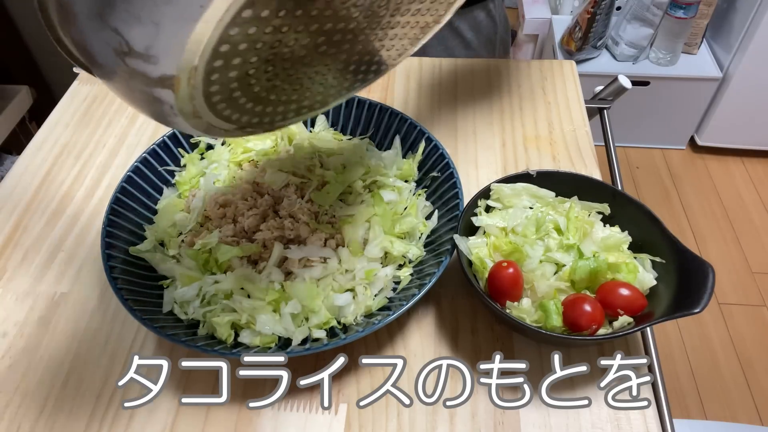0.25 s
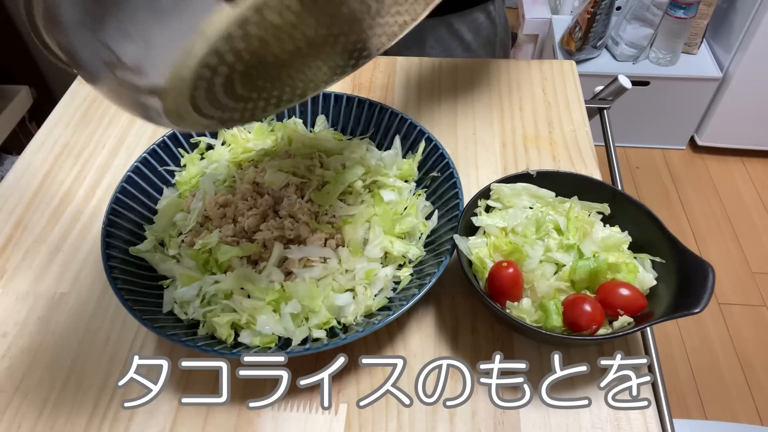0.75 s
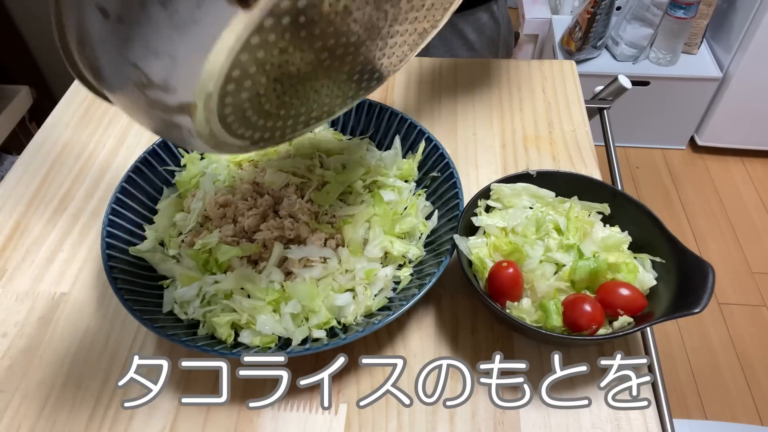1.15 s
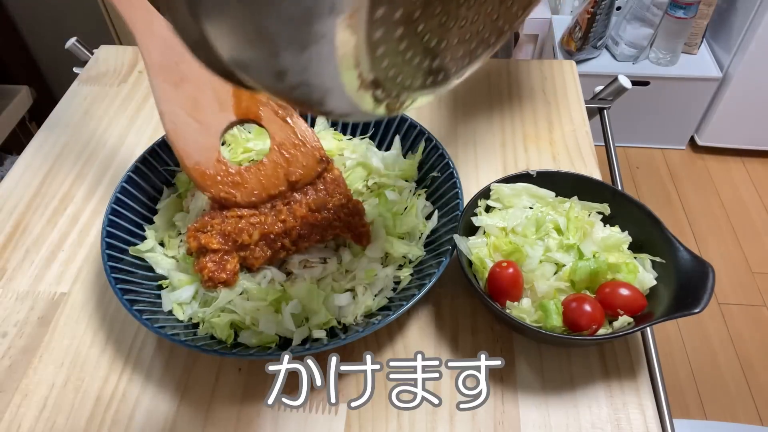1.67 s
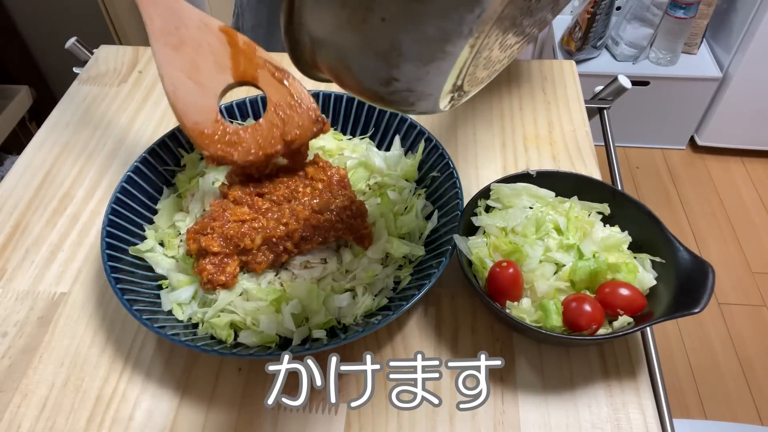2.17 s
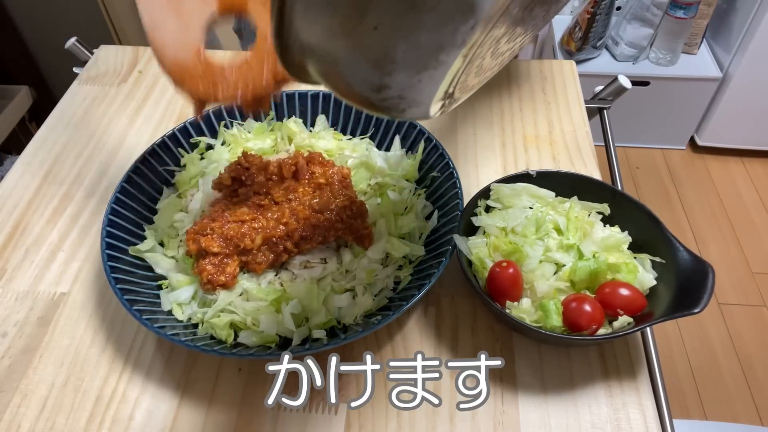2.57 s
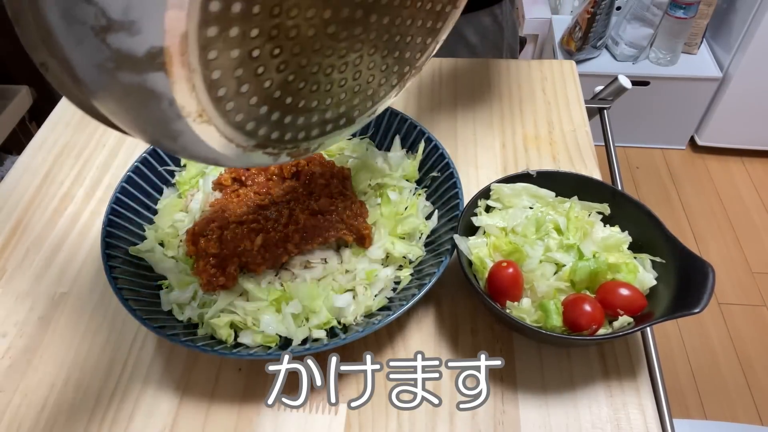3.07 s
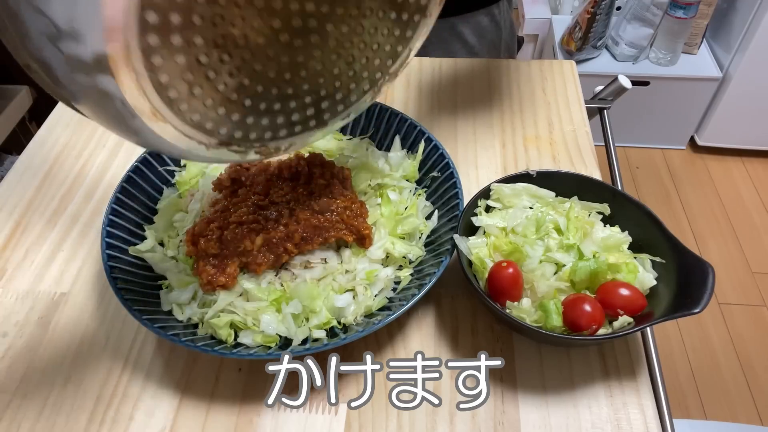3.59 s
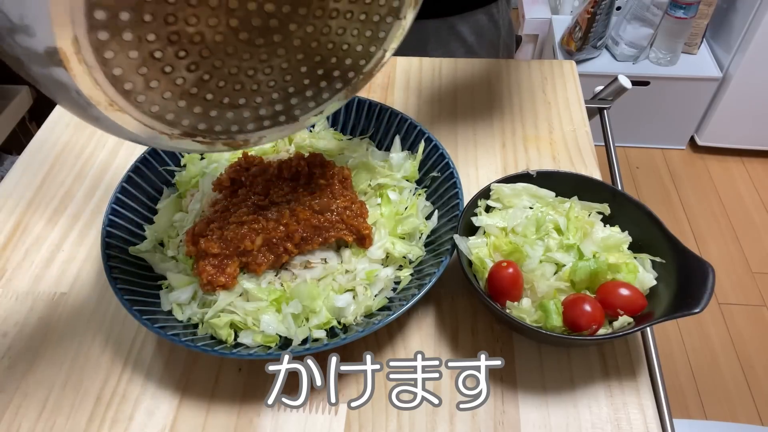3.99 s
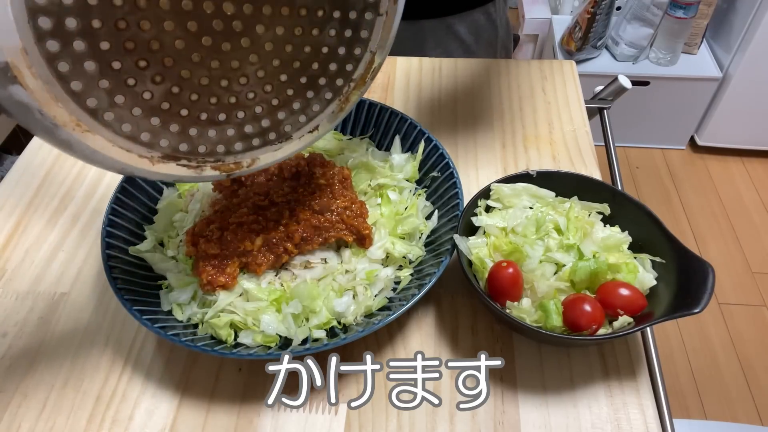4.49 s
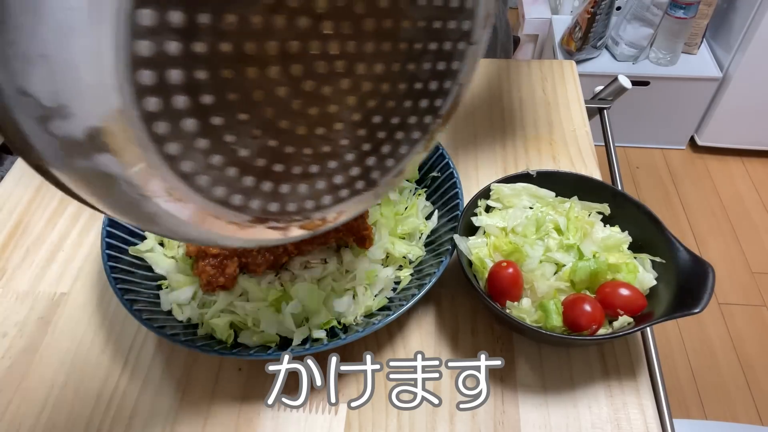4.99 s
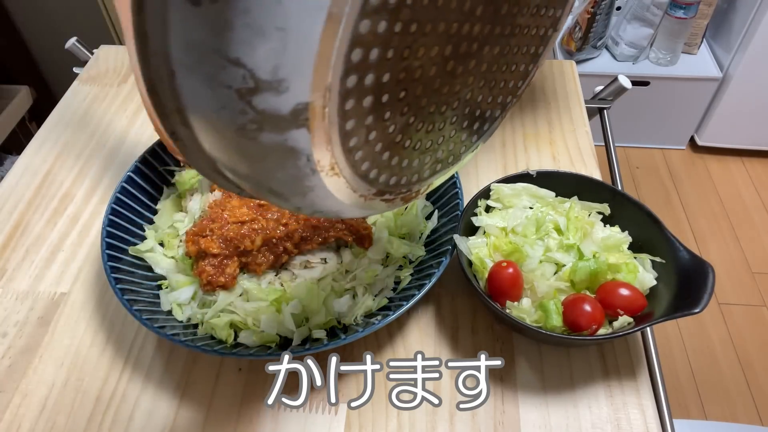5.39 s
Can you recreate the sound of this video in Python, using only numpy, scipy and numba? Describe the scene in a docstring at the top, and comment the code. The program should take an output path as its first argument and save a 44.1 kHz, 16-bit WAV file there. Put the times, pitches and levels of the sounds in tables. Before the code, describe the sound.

Close to the microphone in a small, softly humming kitchen, wood clacks and drags against the inside of a sauce-coated steel pot four times, with a slight squeak. Faint wet ticks fill a short break. A second run of sharp knocks and gritty scrapes follows, the metal ringing more freely and the hardest hits slightly overloading. Only light ticks and the hum remain at the end.

```python
"""A wooden spatula pushes thick sauce out of a steel pot, close to a phone in a small, humming kitchen.
First come four strokes: each knock rings the blade and the sauce-damped pot, then the blade drags in
stick-slip friction. Sauce ticks wetly through a pause. From 2.9 s the strokes resume on ever barer steel,
which rings more freely and scrapes brighter; the hardest knocks overload the microphones.
After 4.8 s only a few ticks and a faint hollow rush remain over the appliance hum."""
import sys
import numpy as np
from scipy import signal
from scipy.fft import rfft, irfft, next_fast_len
from scipy.io import wavfile
from numba import njit

SR = 44100
rng = np.random.default_rng(int(sys.argv[2]) if len(sys.argv) > 2 else 0)


def waveform_to_disk(signal):
    """Save audio, clipped to [-1, 1], as 16-bit WAV at the path in sys.argv[1]."""
    frames = np.transpose(np.atleast_2d(signal))
    scaled = np.clip(frames, -1, 1) * 32767
    samples = np.round(scaled).astype(np.int16)
    wavfile.write(sys.argv[1], SR, samples)


N = 248929
TIME = np.arange(N) / SR
EVENT_TIME = TIME[:SR // 3]  # time axis of one knock, drag or tick

# Spectrum of the clack, where many short-lived modes of wood and steel blur: frequency_hz, level_db
CLACK_SPECTRUM = [(100, -22), (400, -8.5), (650, -3.5), (1100, 5), (1400, 7), (2000, -2), (3200, -5.5),
                  (5000, -9), (8000, -7.5), (15000, -29)]
# Blows of the spatula: start_s, level_db, blade_pitch_hz, blade_t60_s, second_mode_hz, second_mode_db
BLOWS = [ (0.0342, -6.5, 886, 0.039, 1117, -14), (0.4235, 1.5, 901.5, .047, 2130, -16.5),
         (0.7522, -6, 913, 0.052, 1766, -14.5), (1.0524, 0, 923.4, 0.064, 2027, -15),
         (1.148, -11, 1052, 0.069, 1699, -19), (2.905, 2.5, 962, 0.042, 1136, -1.5),
         (2.9743, -12.5, 897, 0.027, 1840, 2.5), (3.4927, -1, 1026, 0.019, 1796, -6),
         (3.6395, -9, 823, 0.08, 1660, -1.5), (3.9342, -7.5, 913, 0.0099, 1776, -13.5),
         (3.9779, 1.5, 842, 0.029, 1590, -9), (4.2726, 0, 932, .014, 1782, -3),
         (4.366, 1, 811, 0.063, 1669, -4.5)]

def knocks(second_t60=0.06, clack_t60=0.042, db_per_octave=9.5):
    """Impact excitation: a blow rings blade and pot; harder, shorter contact excites higher modes."""
    out, ring = np.zeros(N), pot_modes()
    for start, db, hz, t60, second_hz, second_db in BLOWS:
        blade = mode(hz, t60) + undb(second_db) * mode(second_hz, second_t60)
        wall = undb(wall_state(start, coated=-20, bare=-3.5)) * ring
        noise = colour(rng.standard_normal(len(EVENT_TIME)), CLACK_SPECTRUM)
        clack = undb(-12) * noise * fade(EVENT_TIME, clack_t60)
        cutoff_hz = wall_state(start, coated=3203, bare=4400) * 2 ** (db / db_per_octave)
        contact = signal.butter(3, min(cutoff_hz, SR / 3), fs=SR, output="sos")
        add(out, start, undb(db) * signal.sosfilt(contact, blade + wall + clack))
    return out

def thuds(first_hz=620, last_hz=170, sink_s=0.0035, rise_s=0.0055, t60=0.022, growth=0.96, left_db=-13):
    """Damped chirp: a dull low thump with each knock falls quickly in pitch, mostly on the right."""
    out = np.zeros(N)
    hz = last_hz + (first_hz - last_hz) * np.exp(-EVENT_TIME / sink_s)
    envelope = (1 - np.exp(-EVENT_TIME / rise_s)) * fade(EVENT_TIME, t60)
    thump = np.sin(2 * np.pi * np.cumsum(hz) / SR) * envelope
    thump = signal.sosfilt(signal.butter(1, 130, "high", fs=SR, output="sos"), thump)
    for start, db, *_ in BLOWS:
        add(out, start, undb(growth * db - 7) * thump)
    return out * undb([[left_db], [0]])

# Spectrum of the friction noise before its tilt: frequency_hz, level_db
GRIT_SPECTRUM = [(100, -26), (250, -19), (520, 10.5), (720, 4.5), (1000, -8.5), (1600, -6), (2200, 0.5),
                 (3400, -5), (5000, -15), (6500, -16.5), (9000, -27), (12000, -31), (15000, -42.5)]
# High resonances of the blade's edge: centre_hz, width_hz, level_db
EDGE_MODES = [(2440, 130, -22.5), (3357, 350, -13), (4540, 340, -19), (6660, 770, -26)]
# Drags of the blade over the wall: start_s, firmest_s, end_s, level_db
BLADE_DRAGS = [ (.099, .181, 0.2, -21.5), (0.431, 0.513, 0.55, -20.5), (0.785, 0.881, 0.9, -20),
               (1.08, 1.164, 1.2005, -24.5), (1.417, 1.482, 1.505, -51.5), (2.878, 2.97, 3.013, -27.5),
               (3.016, 3.018, 3.17, -46), (3.19, 3.204, 3.304, -43.5), (3.495, 3.614, 3.643, -25),
               (3.651, 3.715, 3.75, -47), (3.919, 3.973, 4.102, -34), (4.268, 4.376, 4.4, -31),
               (4.459, 4.53, 4.58, -60), (4.649, 4.776, 4.77, -68.5)]

def drags(land_s=0.03, lift_s=0.02, start_db=-17, end_db=-10, firm_db=-21, overtone_ratio=1.576):
    """Friction-driven vibration: slips hiss and ring pot and blade, whose pitch sinks as it bends."""
    out = np.zeros(N)
    for start, firmest, end, db in BLADE_DRAGS:
        t = start + EVENT_TIME
        touching = np.clip(np.minimum((t - start) / land_s, (end - t) / lift_s), 0, 1)
        slack = np.interp(t, [start, firmest], [1, 0])
        easing = np.interp(t, [firmest, end], [0, 1])
        pressure = touching * undb(start_db * slack + end_db * easing ** 2)
        jerks = slips()
        # the grit turns bright once the last film of sauce is gone
        tilt = wall_state(start, coated=2.33, bare=6.5, curve=4.4)  # dB per octave
        tilted = [(hz, level + tilt * np.log2(hz)) for hz, level in GRIT_SPECTRUM]
        grit = undb(-5) * pressure ** 0.67 * colour(jerks, tilted)
        sag = wall_state(start, coated=0.15, bare=0.067)
        pitch_hz = wall_state(start, coated=1143, bare=858) * np.interp(t, [start, end], [1, 1 - sag])
        blade = band(jerks, pitch_hz, width_hz=270)
        blade += undb(-9) * band(jerks, overtone_ratio * pitch_hz, width_hz=600)
        blade *= undb(wall_state(start, coated=5, bare=-2.5))
        edge = sum(undb(level) * band(jerks, hz, width) for hz, width, level in EDGE_MODES)
        edge *= undb(wall_state(start, coated=1.5, bare=-12))  # wet wood sings more than dry
        ring = pot_modes(4 + tilt / 2)  # slips are sharper than a blow and favour the high modes
        wall = signal.fftconvolve(jerks * pressure, ring / np.linalg.norm(ring))[:len(t)]
        # a light touch leaves bare wall free to ring
        freedom_db = wall_state(start, coated=0.079, bare=0.48) * (firm_db - db)
        wall *= undb(wall_state(start, coated=-5, bare=2.5) + freedom_db)
        add(out, start, undb(db) * (grit + pressure * (blade + edge) + wall))
    return out

def slips(per_s=2500, scatter_db=1.0, catch_s=0.0051, catch_db=-2.5):
    """Stick-slip friction: a dense random train of tiny jerks, stronger where the blade catches."""
    n = len(EVENT_TIME)
    slipping = rng.random(n) < per_s / SR
    size = undb(scatter_db * np.minimum(rng.exponential(size=n), 4))
    catches = np.interp(EVENT_TIME / catch_s, np.arange(n), rng.standard_normal(n))
    return unit(slipping * size * undb(catch_db * catches) * rng.choice([-1, 1], n))

# Bending modes of the pot before loading: frequency_hz, level_db, t60_s
POT_MODES = [(357.5, -28, 0.26), (534, -17, 0.14), (702, -17, 0.088), (830, -9, 0.31), (1165.3, -17, 0.078),
             (1269, -11, 0.041), (1432.5, -12.5, 0.046), (1686, -15, .14), (1810, -22.5, 0.1),
             (2115, -30.5, 0.11), (2570, -31.5, 0.047), (2730, -26.5, 0.11), (2768, -28.5, 0.035),
             (3290, -25.5, 0.07), (3324, -32, 0.099), (3987, -27.5, 0.06), (4340, -34, 0.1),
             (4700, -37.5, 0.0404), (5340, -38, 0.062), (5470, -36.5, .07), (5717, -42, 0.035),
             (6560, -39, 0.051), (6990, -35.5, 0.035), (7060, -36, .03), (7750, -32, 0.09),
             (10500, -40.5, 0.03), (11400, -43.5, 0.063), (11300, -43, 0.053), (13200, -42, 0.045)]

def pot_modes(tilt_db_per_octave=0, loading=0.019, max_cycles=230):
    """Modal superposition: the pot's impulse response; blade and sauce shift and damp high modes most."""
    hz, db, t60 = np.transpose(POT_MODES)
    hz = hz * (1 + loading * np.minimum(hz / 6000, 1) ** 2 * rng.standard_normal(len(hz)))
    t60 = np.minimum(t60, max_cycles / hz)
    polarity = (-1) ** np.arange(1, len(hz) + 1)  # neighbouring modes swing in opposite directions
    gain = polarity * undb(db + tilt_db_per_octave * np.log2(hz / hz[0]))
    return gain @ mode(hz[:, None], t60[:, None])

# Share of the wall scraped bare: time_s, bare_fraction
BARE_SHARE = [(0, 0.01), (1.2, 0.08), (2.9, 0.4), (3.5, 0.67), (4.3, 0.86)]

def wall_state(time_s, coated, bare, curve=1):
    """Viscous damping: sauce damps and softens the wall, so a property moves from coated to bare."""
    share = np.interp(time_s, *np.transpose(BARE_SHARE))
    return coated + (bare - coated) * share ** curve

# Squeaks of wet wood on steel: peak_s, pitch_hz, level_db, half_length_s
WOOD_SQUEAKS = [(.524, 4390, -21.5, 0.024), (0.882, 4475, -30, 0.022), (2.982, 3972, -18.5, .015)]

def squeaks(width_hz=170):
    """Mode lock-in: for a moment the slips fall into step with one high resonance."""
    out = np.zeros(N)
    for peak, hz, db, half_length in WOOD_SQUEAKS:
        swell = np.hanning(int(2 * half_length * SR))
        tone = band(rng.standard_normal(len(EVENT_TIME)), hz, width_hz)[-len(swell):]
        add(out, peak - half_length, undb(db) * unit(tone) * swell ** 2)
    return out

# Ticks of parting sauce and of the blade's edge: start_s, peak_db, centre_hz, t60_s
SHARP_TICKS = [(0.305, -48.5, 5000, .06), (.657, -39, 7140, .07), (.961, -45.5, 5130, .03),
               (1.7792, -47, 7770, .02), (1.911, -39, 10380, .01), (1.957, -39, 6620, .01),
               (2.4608, -31, 10440, .012), (2.975, -11, 3860, .025), (3.035, -36, 6240, .14),
               (3.344, -44, 7840, .08), (4.772, -49.5, 4400, 0.052), (5.2656, -48.5, 4000, .02),
               (5.4703, -47.5, 10130, .012)]

def ticks(width_hz=5000, crest_factor=2, faint_db=-54, faint_hz=8000, faint_t60=0.015, faint_count=8):
    """Broadband transients: sauce films rupture and the edge flicks steel; faint ticks fall at random."""
    out = np.zeros(N)
    faint = [(start, faint_db, faint_hz, faint_t60) for start in rng.uniform(0, TIME[-1], faint_count)]
    for start, db, hz, t60 in SHARP_TICKS + faint:
        noise = band(rng.standard_normal(len(EVENT_TIME)), hz, width_hz)
        add(out, start, undb(db) / crest_factor * noise * fade(EVENT_TIME, t60))
    return out

# Phase of the left microphone port against the right: frequency_hz, lead_rad
PORT_LEAD = [(0, 0), (860, 0.7), (1810, -1.0), (2930, -1.8), (3790, -4.2), (4570, -2.9), (5940, 0.4),
             (7750, 2.4), (9560, 3.5), (11000, 6.2), (12300, 6.4), (13300, 9.1), (15200, 9.6),
             (15800, 11.3)]
# Level of the left port against the right: frequency_hz, balance_db
PORT_LEVEL = [(60, -6.5), (110, -2), (200, -12), (380, -17.5), (700, -6), (1290, -4), (2380, -3.5),
              (4400, -7), (8120, 3.5), (15000, 0)]
SIDE = np.array([[0.5], [-0.5]])  # shares a contrast between left and right

def ports(x):
    """Direct path: sound reaches the two microphone ports with frequency-dependent phase and strength."""
    size = next_fast_len(N + len(EVENT_TIME))
    gain = undb(SIDE * spectrum(PORT_LEVEL, size))
    phase = SIDE * spectrum(PORT_LEAD, size)
    return irfft(rfft(x, size) * gain * np.exp(1j * phase), size)[:, :N]

# Echoes from table and walls: right_delay_s, level_db, left_lag_s
REFLECTIONS = [(.0031, -9, 0.014), (0.0127, -18, 0.0049), (0.0271, -18, -0.012)]

def room(x, tail_db=-13, low_t60=0.39, high_t60=0.42, split_hz=2500, build_s=0.0012):
    """Reverberation: the direct sound is followed by early reflections and a short diffuse tail."""
    early = ports(x)
    for delay, db, lag in REFLECTIONS:
        add(early[0], delay + lag, undb(db) * x)
        add(early[1], delay, undb(db) * x)
    t = TIME[:SR // 2]
    tail = np.zeros((2, len(t)))
    for kind, t60 in ("low", low_t60), ("high", high_t60):
        crossover = signal.butter(2, split_hz, kind, fs=SR, output="sos")
        tail += signal.sosfilt(crossover, rng.standard_normal(tail.shape)) * fade(t, t60)
    tail *= np.minimum(t / build_s, 1)
    tail /= np.linalg.norm(tail, axis=1, keepdims=True)
    return early + undb(tail_db) * signal.fftconvolve(x[None], tail, axes=1)[:, :N]

# Spectrum of the kitchen's air noise: frequency_hz, level_db
AIR_SPECTRUM = [(25, -23.5), (58, 2), (85, -2), (155, -4), (230, -9), (380, -12), (600, -17.5),
                (850, -24.5), (1250, -24.5), (1600, -34.5), (2000, -40.5), (3300, -47.5), (6000, -47.5),
                (10500, -46), (13000, -45), (16000, -57)]
# Partials of the appliance hum: frequency_hz, rms_db, left_minus_right_db
HUM_PARTIALS = [(59.3, -46, -5), (119.4, -50, 1), (151, -60, -2), (317, -63, -4), (468, -69, -3),
                (549, -71, -3), (1249, -72, -4)]

def kitchen(shared_db=-48, apart_db=-53, pan_db=-4.5, waver_db=1.0, drift_rad=0.73):
    """Amplitude and phase modulation: an appliance hum wavers over a partly coherent rush of air."""
    shared = undb(shared_db) * colour(rng.standard_normal(N), AIR_SPECTRUM)
    apart = undb(apart_db) * colour(rng.standard_normal((2, N)), AIR_SPECTRUM)
    out = (shared + apart) * undb(SIDE * pan_db)
    knots_s = np.linspace(0, TIME[-1], 30)
    for hz, db, balance_db in HUM_PARTIALS:
        swell, drift = (np.interp(TIME, knots_s, walk) for walk in rng.standard_normal((2, 30)))
        amplitude = np.sqrt(2) * undb(db + waver_db * swell + SIDE * balance_db)
        out += amplitude * np.sin(2 * np.pi * hz * TIME + drift_rad * drift)
    return out

def hollow_rush(start_s=4.89, end_s=5.5, centre_hz=2400, width_hz=420, level_db=-72):
    """Narrow-band noise: a faint hollow rush swells while the pot hangs close to the microphones."""
    swell = np.sin(np.pi * np.clip((TIME - start_s) / (end_s - start_s), 0, 1))
    return undb(level_db) * swell * band(rng.standard_normal(N), centre_hz, width_hz)

def undb(db):
    """Decibels to amplitude ratio."""
    return 10 ** (np.asarray(db) / 20)

def unit(x):
    """Normalisation to rms 1."""
    return x / np.sqrt(np.mean(x ** 2))

def spectrum(points, size):
    """Log-frequency interpolation of (frequency_hz, value) points at the bins of a transform."""
    hz, value = np.transpose(points)
    return np.interp(np.log(np.fft.rfftfreq(size, 1 / SR) + 1), np.log(hz), value)

def colour(x, points):
    """Spectral shaping by (frequency_hz, level_db) points, at rms 1."""
    size = next_fast_len(x.shape[-1])
    shaped = rfft(x, size) * undb(spectrum(points, size))
    return unit(irfft(shaped, size)[..., :x.shape[-1]])

def fade(t, t60):
    """Exponential decay, 60 dB in t60 seconds."""
    return np.exp(-np.log(1000) * t / t60)

def mode(hz, t60):
    """Free vibration of a damped oscillator."""
    return np.sin(2 * np.pi * hz * EVENT_TIME) * fade(EVENT_TIME, t60)

def add(track, start_s, x):
    """Superposition of a sound onto a track."""
    i = max(int(start_s * SR), 0)
    track[i:i + len(x)] += x[:N - i]

@njit
def resonate(x, hz, width_hz):
    """Forced resonance: a state-variable band-pass whose centre may move every sample."""
    y, band_state, low_state = np.empty(len(x)), 0., 0.
    for i in range(len(x)):
        step, damping = np.tan(np.pi * hz[i] / SR), width_hz / hz[i]
        velocity = (band_state + step * (x[i] - low_state)) / (1 + step * (step + damping))
        band_state = 2 * velocity - band_state
        low_state += 2 * step * velocity
        y[i] = damping * velocity
    return y

def band(x, hz, width_hz):
    """Two resonators in cascade, each width_hz wide, at rms 1."""
    hz, width_hz = hz + np.zeros(len(x)), float(width_hz)
    return unit(resonate(resonate(x, hz, width_hz), hz, width_hz))

def scene():
    """Superposition: the strokes excite the room, while the squeaks beam straight at the phone."""
    return room(knocks() + drags() + ticks()) + ports(squeaks()) + thuds() + kitchen() + hollow_rush()

def record(dry, low_hz=40, top_hz=16000):
    """Band limiting and overload: the phone sheds deep rumble, clips at full scale and cuts the top."""
    thinned = signal.sosfilt(signal.butter(2, low_hz, "high", fs=SR, output="sos"), dry)
    clipped = np.clip(thinned, -1, 1)
    return signal.sosfilt(signal.ellip(8, 0.05, 70, top_hz, fs=SR, output="sos"), clipped)

dry = scene()
out = record(dry)
waveform_to_disk(out)
```